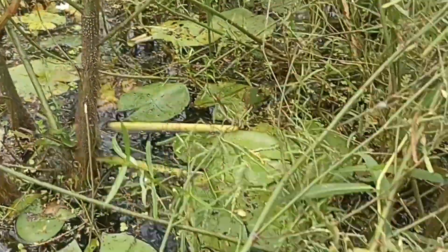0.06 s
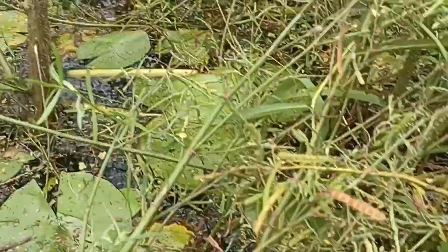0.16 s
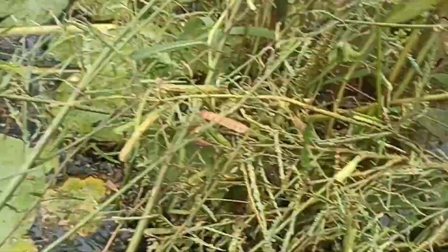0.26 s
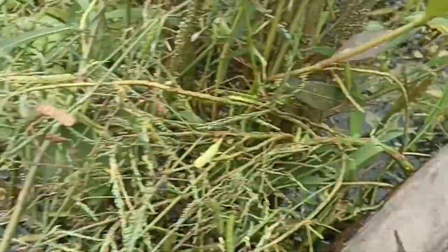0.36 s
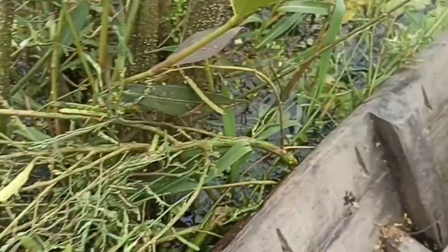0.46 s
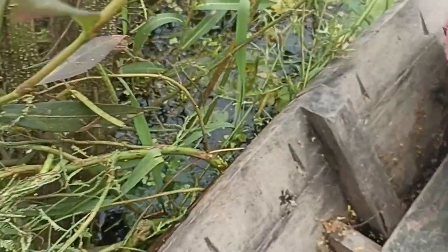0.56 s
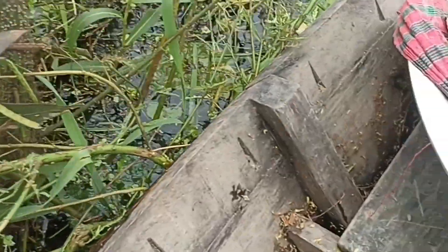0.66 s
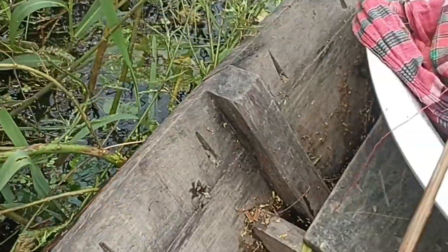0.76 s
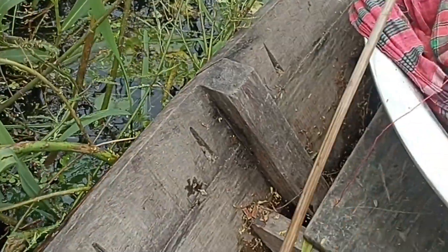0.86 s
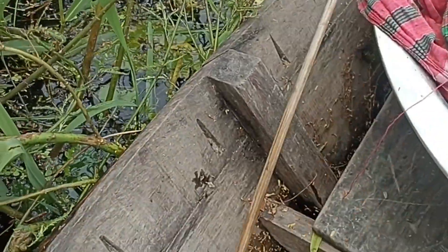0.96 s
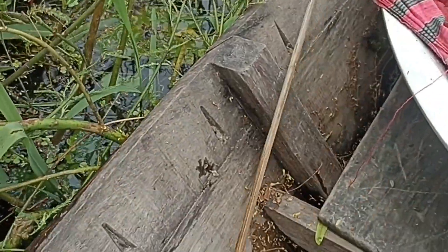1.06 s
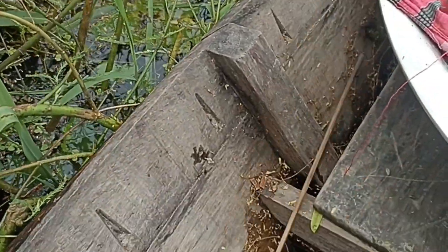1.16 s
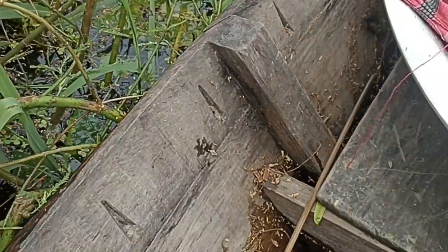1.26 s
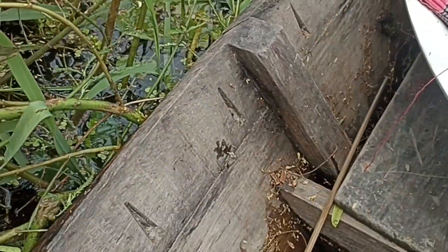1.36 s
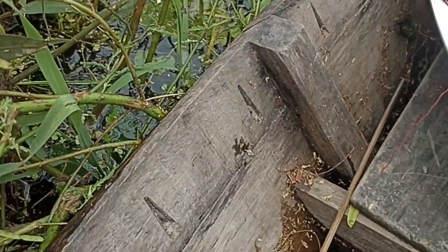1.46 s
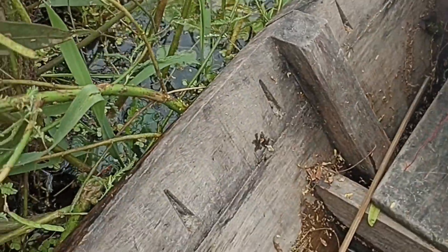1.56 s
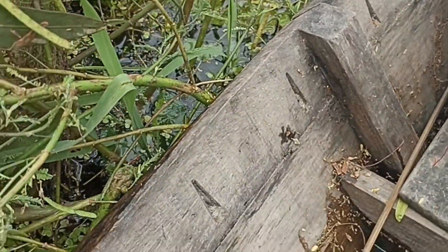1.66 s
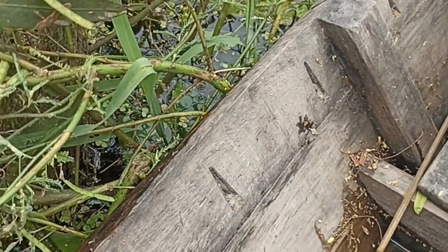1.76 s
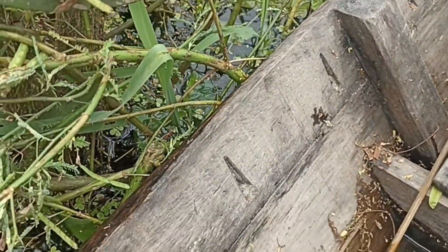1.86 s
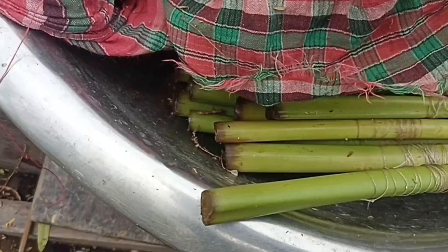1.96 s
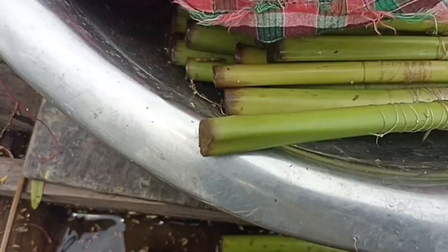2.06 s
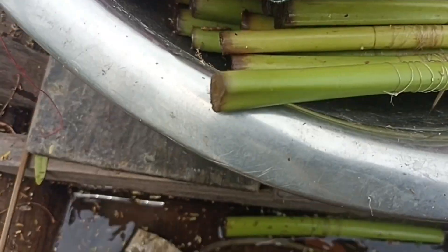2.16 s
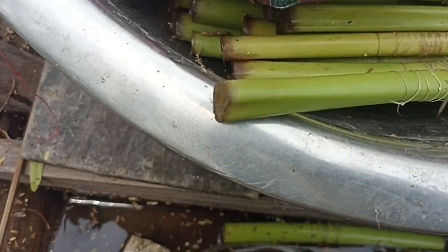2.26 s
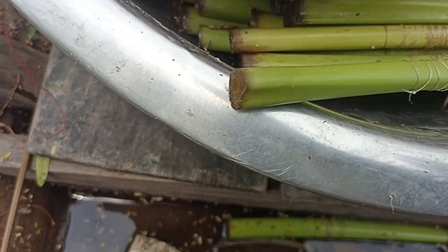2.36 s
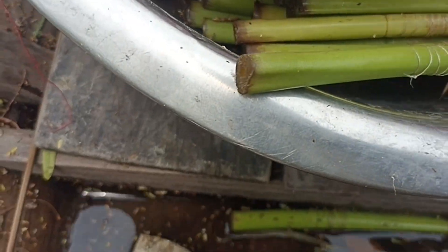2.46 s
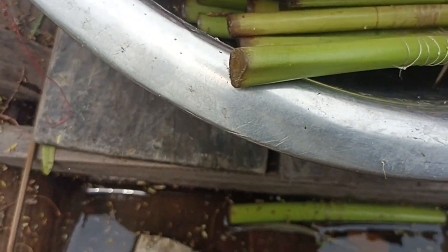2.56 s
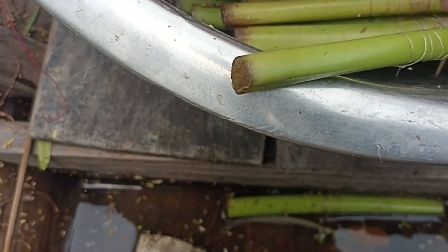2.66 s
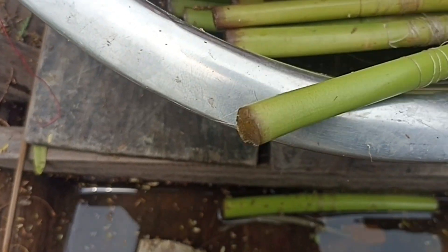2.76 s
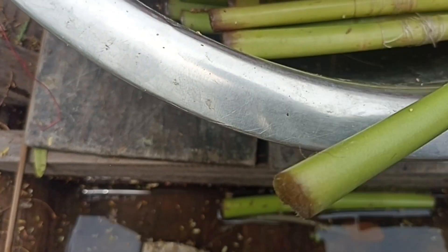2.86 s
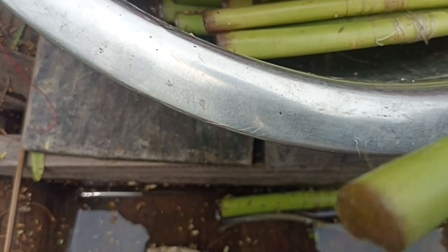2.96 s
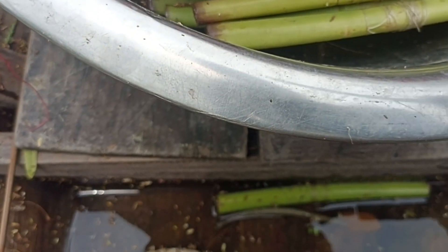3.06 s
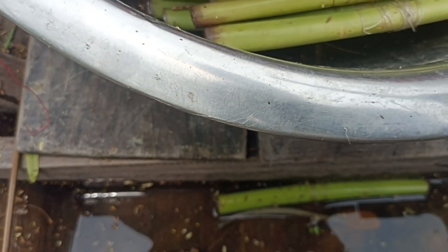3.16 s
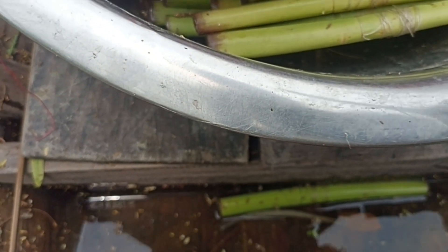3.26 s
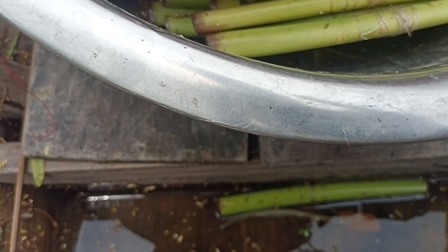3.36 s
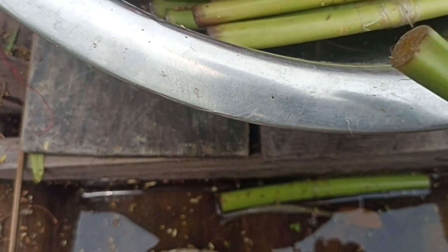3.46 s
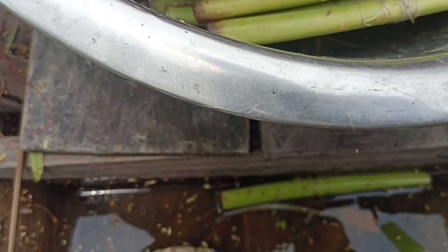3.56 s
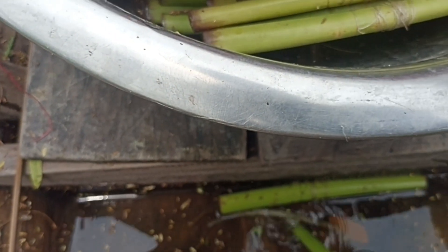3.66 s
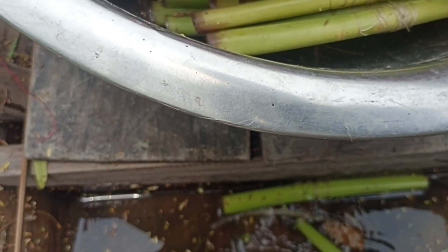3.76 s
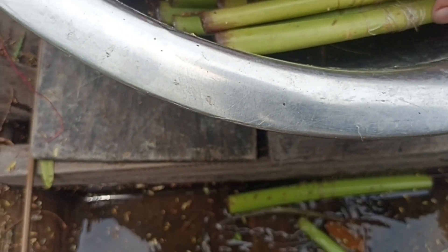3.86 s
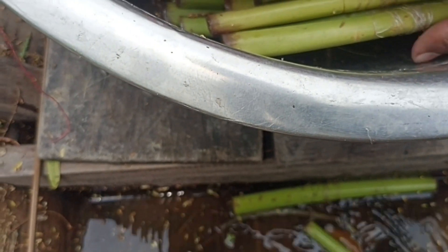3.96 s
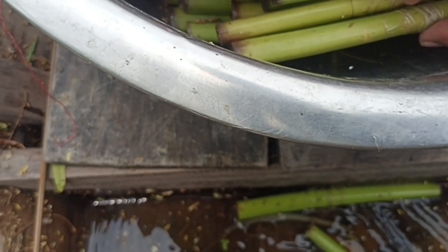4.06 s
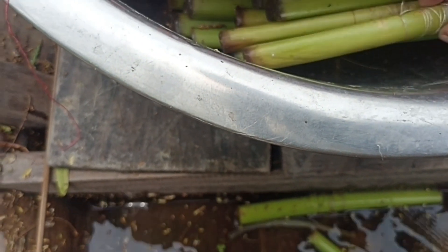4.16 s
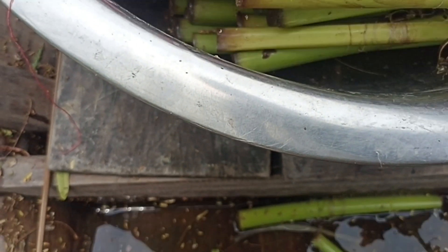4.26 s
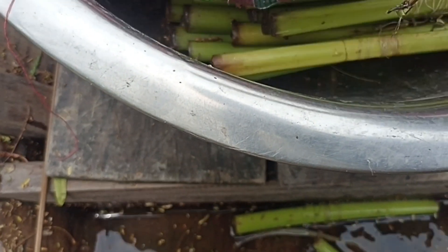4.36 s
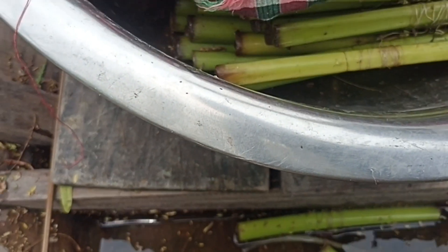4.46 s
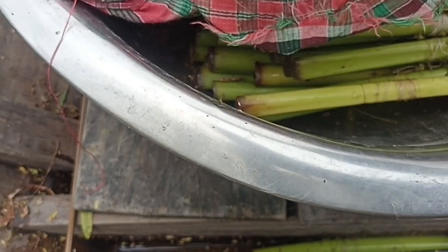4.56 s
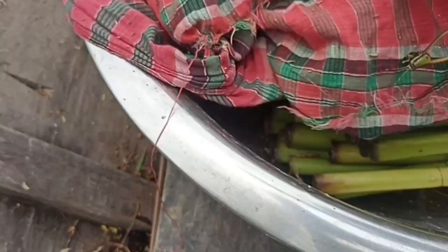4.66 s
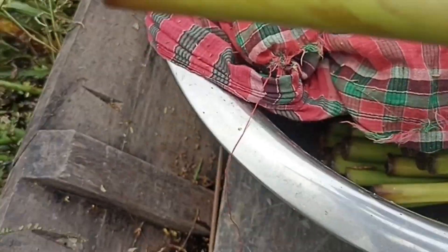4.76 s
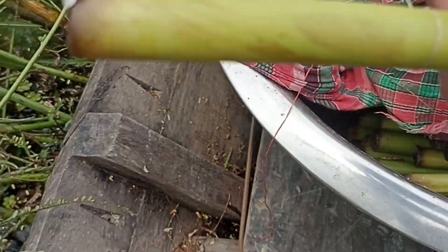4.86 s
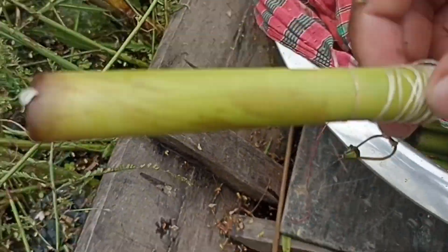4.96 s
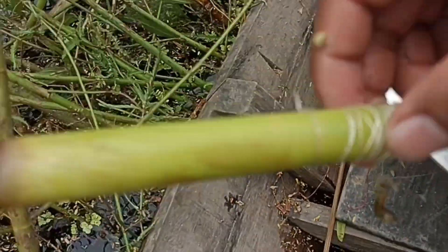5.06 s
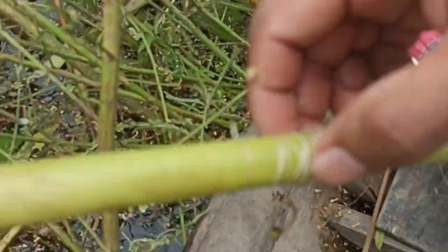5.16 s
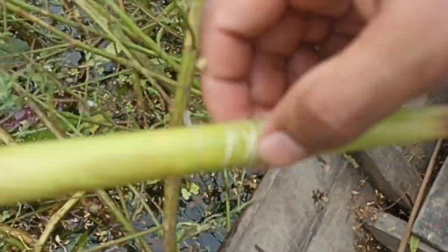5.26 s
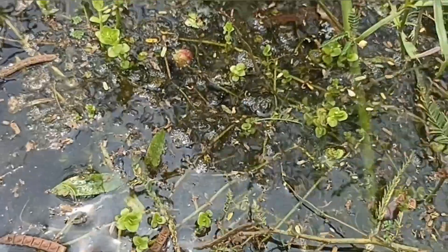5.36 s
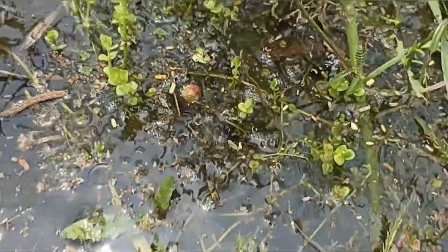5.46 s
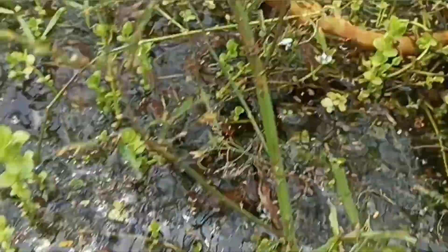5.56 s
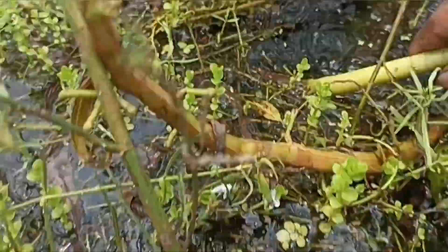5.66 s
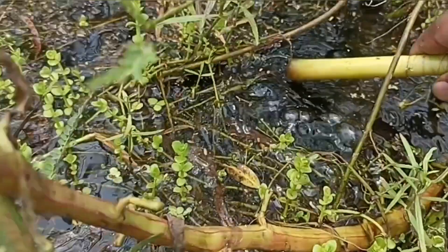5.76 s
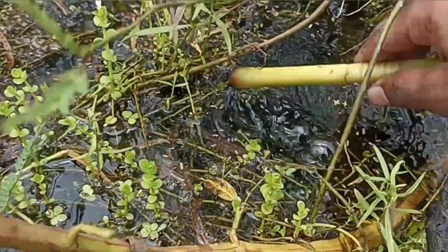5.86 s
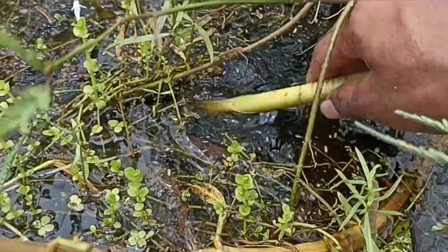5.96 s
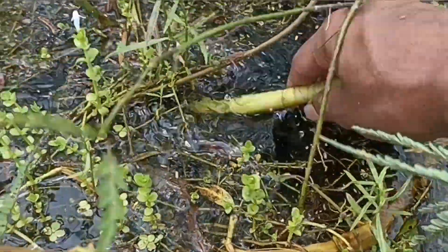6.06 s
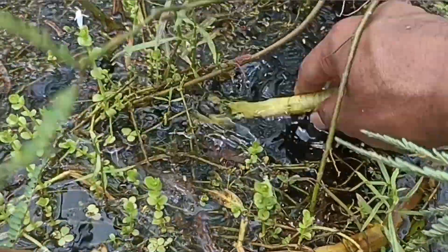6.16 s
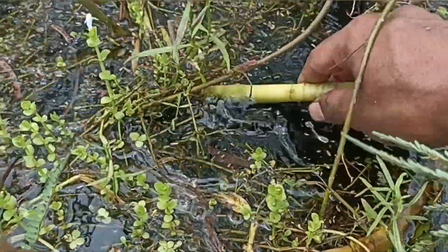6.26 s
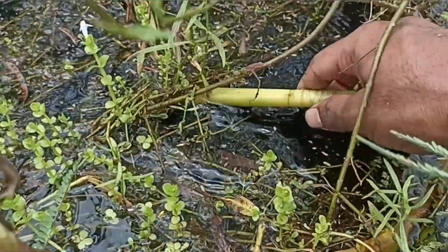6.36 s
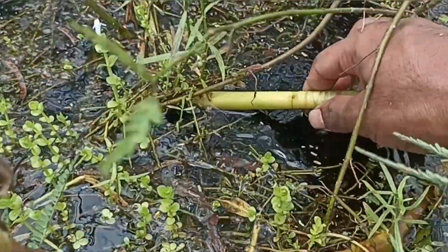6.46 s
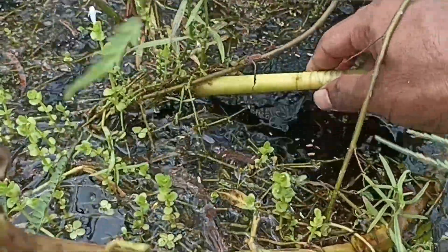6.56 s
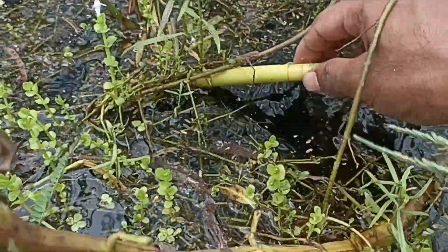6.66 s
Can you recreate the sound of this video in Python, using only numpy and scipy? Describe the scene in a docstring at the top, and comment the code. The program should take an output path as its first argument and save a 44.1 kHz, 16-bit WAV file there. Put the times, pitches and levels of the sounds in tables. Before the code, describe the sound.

Quiet outdoor wooden boat: light wooden knocks and a scrape, a dull basin bump and splash, then bubbly dips among wet weeds.

```python
"""In a wooden boat on a weedy marsh, green bamboo is taken from a metal basin and pushed into the water.
A thin pole is laid down and slides on the planks, a piece bumps the basin and drops into the bilge,
then stems snap and bubbles ring as another goes into the marsh; weeds rustle over a faint high hiss
and a few far bird-like notes. Solid bodies are sums of decaying modes, bubbles are gliding decaying
sines, and friction, spray, weeds and air are shaped noise."""
import sys
import numpy as np
from scipy import signal
from scipy.fft import rfft, irfft
from scipy.io import wavfile
from scipy.ndimage import uniform_filter1d

SR = 44100
rng = np.random.default_rng(int(sys.argv[2]) if len(sys.argv) > 2 else 0)


def put_to_file(sound):
    """Save the sound as 16-bit audio at rate SR, in the file named by the first command-line argument."""
    columns = np.atleast_2d(sound).T  # one column per channel
    safe = np.clip(columns, -1, 1)
    whole_steps = np.round(safe * 32767)
    wavfile.write(sys.argv[1], SR, whole_steps.astype(np.int16))


N = 295911
TIME = np.arange(N) / SR
RING = TIME[:SR // 2]  # time axis of one event
EARS = np.array([[1], [-1]])  # left, right

# modes of the wooden hull: (frequency [Hz], level [dB], T60 [s], phase between the ears [rad],
# left minus right [dB])
HULL_MODES = [(167, -8.5, 0.23, 0.013, -7), (214.5, -7, 0.19, 0.14, -1), (272.4, 0.5, 0.049, -0.73, 2),
              (297, -5, 0.059, 0.12, 2), (344, 3, 0.072, 0.71, -2), (472, -16, 0.15, 0.78, 13),
              (558, 3, 0.041, 0.38, -2), (654, 3, 0.05, 0.54, 1.5), (803, -13, 0.076, 1.1, 15),
              (900, 1, 0.035, 0.85, 4), (1039, -27, 0.28, -0.9, -9), (1377, -4.5, 0.043, 1.4, -1)]


def undb(db):
    """A level in decibels is 20 times the logarithm of the amplitude gain."""
    return 10 ** (np.asarray(db) / 20)


def unit(x):
    """Normalisation by the root mean square gives equal mean power."""
    return x / np.sqrt(np.mean(x ** 2))


def decay(time, t60):
    """Exponential damping: the amplitude falls by 60 dB in t60."""
    return np.exp(-np.log(1000) * time / t60)


def pan(db):
    """An interaural level difference is shared equally between the two ears."""
    return undb(EARS * db / 2)


def band(x, lo_hz, hi_hz, order=2):
    """A causal band-pass keeps one region of the spectrum."""
    hi_hz = min(hi_hz, .47 * SR)
    lo_hz = min(lo_hz, hi_hz / 2 ** (1 / 8))
    sos = signal.butter(order, [lo_hz, hi_hz], "band", fs=SR, output="sos")
    return signal.sosfilt(sos, x)


def stereo_noise():
    """Independent white noise at the two ears, as long as one event."""
    return rng.standard_normal((2, len(RING)))


def soften(x, hz):
    """Contact time: a soft contact pushes for longer and leaves the high modes quiet."""
    return signal.sosfilt(signal.butter(1, min(hz, SR / 3), fs=SR, output="sos"), x)


def radiate(x):
    """Radiation efficiency: small bodies send out little deep bass."""
    return signal.sosfilt(signal.butter(7, 172, "high", fs=SR, output="sos"), x)


def by_frequency(points):
    """A spectrum is joined from (frequency [Hz], value) points on a logarithmic axis."""
    hz, value = np.transpose(points)
    bins_hz = np.arange(N // 2 + 1) * SR / N
    return np.interp(np.log(bins_hz + 1), np.log(hz), value)


def walk(rate):
    """Slow random modulation: rate new levels a second, joined by straight slopes."""
    hold = int(SR / rate)
    levels = np.repeat(rng.standard_normal(N // hold + 1), hold)
    return uniform_filter1d(levels, hold)[:N]


def crackle(rate, spread_db):
    """A Poisson-like train of tiny impacts, most weak and a few strong."""
    happens = rng.random(N) < rate / SR
    size = np.minimum(rng.exponential(size=N), 4)
    sign = rng.choice([-1, 1], N)
    return happens * sign * undb(spread_db * size)


def swell(middle_s, half_s):
    """A flat-topped envelope that comes up, holds and goes down smoothly."""
    return np.exp(-.5 * ((TIME - middle_s) / half_s) ** 4)


def gesture(start_s, stop_s, attack_s, release_t60):
    """A driven-system envelope: an attack, a hold until stop_s and a free decay."""
    attack = 1 - np.exp(-np.maximum(TIME - start_s, 0) / attack_s)
    return attack * decay(np.maximum(TIME - stop_s, 0), release_t60)


def burst(hz, t60, spread, onset_s, grain_db):
    """Damped band noise around one frequency, grainy from random gains held about 1 ms."""
    hold = SR // 1000
    grains = np.repeat(rng.standard_normal(len(RING) // hold + 1), hold)[:len(RING)]
    envelope = decay(RING, t60) * (1 - np.exp(-RING / onset_s))
    grainy = stereo_noise() * undb(grain_db * grains)
    noise = band(grainy, hz / spread, hz * spread, order=1) * envelope
    return unit(noise) * np.sqrt(np.mean(envelope ** 2))


def add(out, s, sound):
    """Linear superposition: a sound is mixed in at time s."""
    i = min(int(s * SR), N)
    out[:, i:i + sound.shape[1]] += sound[:, :N - i]


def ring(modes):
    """Modal superposition: each decaying mode has its own phase and balance at the ears."""
    out = np.zeros((2, len(RING)))
    for hz, db, t60, phase, pan_db in modes:
        tone = np.sin(2 * np.pi * hz * RING + EARS * phase / 2)
        out += undb(db) * pan(pan_db) * decay(RING, t60) * tone
    return out


def knocks(modes, blows, crack_db, crack_db_per_octave, crack_t60, crack_lo_hz, crack_hi_hz):
    """Impact excitation rings the modes and a short noise crack, its share set by contact brightness."""
    out, body = np.zeros((2, N)), ring(modes)
    for s, db, contact_hz in blows:
        crack = unit(band(stereo_noise(), crack_lo_hz, crack_hi_hz)) * decay(RING, crack_t60)
        crack_gain = undb(crack_db + crack_db_per_octave * np.log2(contact_hz / 1000))
        add(out, s, undb(db) * soften(body + crack_gain * crack, contact_hz))
    return radiate(out)


def basin_knocks():
    """Modal ringing of the metal basin when a piece bumps it."""
    # modes of the basin: (frequency [Hz], level [dB], T60 [s], phase between the ears [rad],
    # left minus right [dB])
    modes = [(205, -15, .3, 1.4, 3), (253.5, 0, .07, -.5, 1), (295, 6.5, .085, -.5, -3),
             (372, -11, .16, -.7, 0), (423, -2, .03, -.1, -6.5), (549, -14, .08, 1.3, -10),
             (641, 3.5, .27, -3, -5), (705, -4, .19, 1.8, 9), (917, -26, 0.3, 0, 6),
             (1057, -27, 0.33, .6, 9), (1253, -16, 0.22, -.4, 1), (1490, -20, 0.06, -.7, -3),
             (1665, -21, 0.08, 1.4, -1), (1960, -23, 0.19, 1.7, -12), (2305, -15, 0.1, 0, 4),
             (2595, -8, 0.05, -1, -3), (2885, -10, 0.13, .8, -8), (2985, -14, 0.16, -2.2, 6),
             (3288, -11, 0.08, -.4, -2), (3525, -12, 0.07, -.6, 5)]
    # blows: (time [s], level [dB], contact brightness [Hz])
    blows = [(3.5497, -40, 1166), (3.5543, -29.5, 1050), (3.5621, -31, 1410), (3.569, -32.5, 700),
             (3.5848, -29.5, 300), (3.5983, -38.5, 400), (4.1087, -42.5, 150), (4.1155, -46.5, 148)]
    return knocks(modes, blows, crack_db=-16, crack_db_per_octave=-1, crack_t60=0.12,
                  crack_lo_hz=330, crack_hi_hz=3200)


def hull_knocks():
    """Modal ringing of the boat's planks; here a brighter contact has a stronger crack."""
    # blows: (time [s], level [dB], contact brightness [Hz])
    blows = [(0.495, -52.5, 2250), (1.137, -44.5, 300), (1.149, -41, 200), (1.165, -46, 250),
             (1.207, -48, 300), (1.189, -50.5, 2200), (1.228, -43.5, 1200), (1.249, -45, 1800),
             (1.257, -31.5, 1390), (1.2614, -33.5, 1010), (1.295, -45, 1300), (1.307, -45.5, 800),
             (1.326, -48.5, 700), (1.339, -50.5, 600), (1.371, -56, 500), (2.727, -48.5, 900),
             (3.7015, -41, 1950), (4.232, -57, 500), (6.117, -51, 1000), (6.533, -54.5, 300)]
    return knocks(HULL_MODES, blows, crack_db=-5.5, crack_db_per_octave=8.0, crack_t60=0.072,
                  crack_lo_hz=504, crack_hi_hz=2160)


def pole_knocks():
    """Short modal ringing of the thin pole as it is laid down."""
    # modes of the pole: (frequency [Hz], level [dB], T60 [s], phase between the ears [rad],
    # left minus right [dB])
    modes = [(910, -6, 0.03, 0.35, 0), (1206, -7, 0.03, 2.6, 4), (1460, 1.5, 0.033, 1.7, 5),
             (1680, -4, .035, -1, 0), (1870, 0, 0.045, 1.3, -5), (2140, -2.5, 0.045, .7, -7),
             (2410, 1.5, 0.06, .6, -1), (2750, -4, 0.027, .7, 0), (3050, -2, 0.045, .7, 0),
             (3300, -3, 0.025, .4, 0)]
    # blows: (time [s], level [dB], contact brightness [Hz])
    blows = [(1.135, -36, 3440), (1.1385, -51, 2910), (1.143, -39, 2470)]
    return knocks(modes, blows, crack_db=0.5, crack_db_per_octave=-1.5, crack_t60=0.064,
                  crack_lo_hz=584, crack_hi_hz=3260)


def stalk_knocks():
    """Modal ringing of a green bamboo stalk when it is struck."""
    # modes of the stalk: (frequency [Hz], level [dB], T60 [s], phase between the ears [rad],
    # left minus right [dB])
    modes = [(410, -12, 0.043, -0.37, 8), (471, 3.5, 0.066, 0.81, -5), (609, -6.5, 0.094, 1, 5),
             (735, -12, 0.13, 0.93, 9), (1150, -22, 0.15, -0.54, 2), (2170, -17, 0.11, 0, 4),
             (2980, -12, 0.11, -1.1, 4), (3314, 1, 0.06, -1.2, -8), (3445, -1.5, 0.1, -1.5, 0),
             (3910, -3.5, .05, 1, 6), (4620, -15, .06, 0, 0)]
    # blows: (time [s], level [dB], contact brightness [Hz])
    blows = [(2.7175, -47, 3000), (2.7228, -44.5, 2500), (2.7278, -42.5, 2000), (3.6925, -38.5, 2500),
             (3.6978, -54, 3990), (3.703, -50, 4500)]
    return knocks(modes, blows, crack_db=5.5, crack_db_per_octave=-4.0, crack_t60=0.076,
                  crack_lo_hz=2870, crack_hi_hz=5900)


def slide(damped_t60=0.015, grain_db=-3, dull_hz=900):
    """Stick-slip friction: the pole's weight damps the hull's ring; the scrape dulls as it slows."""
    start_s, stop_s, level_db = 1.168, 1.316, -46.5
    grain = unit(band(stereo_noise(), 550, 4700, order=1)) * decay(RING, 0.08)
    body = ring(HULL_MODES) * decay(RING, damped_t60) + undb(grain_db) * grain
    slips = crackle(rate=670, spread_db=3.0)
    scrape = unit(radiate(signal.fftconvolve(slips[None], body, axes=1)[:, :N]))
    speed = np.interp(TIME, [start_s, stop_s], [1, 0])  # share of the first speed
    dull = undb(2.5) * soften(scrape, dull_hz)
    scrape = speed * scrape + (1 - speed) * dull
    return scrape * undb(level_db) * gesture(start_s, stop_s, attack_s=0.01, release_t60=0.15)


def bubbles(rise_s=0.0099, onset_s=0.00009, pop_db=-8, pop_t60=0.023, scatter_db=-13, scatter_t60=0.043):
    """Bubble resonance: trapped air pops and rings; big bubbles rise, small ones sag; boat and weeds scatter."""
    # bubbles: (time [s], starting pitch [Hz], level [dB], left minus right [dB])
    bubble_rows = [(3.7015, 3700, -26, 1), (3.7155, 1574, -37.5, -10), (3.716, 3060, -36, -14),
                   (3.721, 1730, -36, -4), (3.7623, 3200, -53, -11), (3.807, 2400, -65, -2),
                   (3.8965, 3680, -50, 4), (3.9444, 2960, -48, 5), (4.0237, 3800, -49.5, -4),
                   (4.168, 2450, -56, 3), (4.185, 2510, -55, 2), (4.2377, 2480, -51, -4),
                   (4.355, 3470, -55, 4), (4.436, 3760, -58.5, -7), (5.429, 2330, -28, -4),
                   (5.4284, 5970, -31, 0), (5.546, 6080, -44, -6.5), (5.653, 3420, -41.5, 2),
                   (5.6605, 3260, -40.5, 0), (5.6688, 547.4, -38, -0.5), (5.671, 1480, -45, 4),
                   (5.681, 1180, -54, 2), (5.687, 2530, -46.5, 0), (5.739, 1120, -48, 5),
                   (5.7402, 1496, -41, 0), (5.787, 2100, -50.5, -1), (5.821, 2780, -53, 0),
                   (5.852, 3370, -52.5, 0), (5.876, 5325, -48, -14), (5.877, 2500, -46.5, 0),
                   (5.907, 2170, -46, 0), (5.935, 1670, -47.5, 2), (6.0482, 2030, -44, 2),
                   (6.051, 1420, -38, 6), (6.0786, 5240, -28.5, -6.5), (6.0783, 1200, -42, 2),
                   (6.078, 2020, -41, 5), (6.089, 1420, -61, 0), (6.1, 6430, -33, -2),
                   (6.108, 1120, -45, 4), (6.1, 630, -64, -8), (6.126, 2060, -31.5, 6),
                   (6.127, 780, -43.5, 3), (6.139, 1070, -47, 4), (6.117, 1730, -52, 2),
                   (6.143, 2500, -51, 0), (6.153, 1520, -60, 2), (6.217, 3370, -51, 2),
                   (6.274, 1080, -63, -5), (6.296, 1400, -45, 4), (6.355, 2600, -58, 0)]
    big_hz, rise_octaves, sag_octaves = 553, 0.77, 0.14
    fade_cycles = 46  # periods until a tone has faded by 60 dB
    out = np.zeros((2, N))
    for s, hz, db, pan_db in bubble_rows:
        volume = (big_hz / hz) ** 3  # relative to the big bubble
        glide_octaves = (rise_octaves * volume - sag_octaves) * (1 - np.exp(-RING / rise_s))
        pitch = hz * 2 ** glide_octaves
        tone = np.sin(2 * np.pi * np.cumsum(pitch) / SR)
        tone = tone * decay(RING, fade_cycles / hz) * (1 - np.exp(-RING / onset_s))
        pop = unit(band(stereo_noise(), hz / 1.1, hz * 1.143)) * decay(RING, pop_t60)
        add(out, s, undb(db) * pan(pan_db) * (tone + undb(pop_db) * pop))
    echoes = stereo_noise() * decay(RING, scatter_t60)
    echoes *= undb(scatter_db) / np.sqrt(np.sum(echoes[0] ** 2))
    return out + signal.fftconvolve(out, echoes, axes=1)[:, :N]


def splashes():
    """Damped spray noise: water slaps and sprays; the finer the spray, the sooner it is over."""
    # splashes: (time [s], level [dB], centre [Hz], left minus right [dB])
    splash_rows = [(3.691, -39, 3820, 15), (3.696, -30, 2670, -5), (3.7016, -21, 12000, 2.5),
                   (3.7163, -46.5, 2190, 5), (3.732, -41.5, 4900, -1), (3.76, -48.5, 3300, 3),
                   (3.806, -50, 5000, -3), (3.943, -37.5, 4000, -5), (4.028, -45, 4160, -2),
                   (5.652, -43, 6300, -2), (5.675, -44.5, 5030, -2), (5.687, -50, 4530, -2),
                   (5.8758, -37, 5270, 2), (6.041, -45.5, 5360, -7), (6.047, -39.5, 2380, -1),
                   (6.073, -42, 5500, 6), (6.088, -39, 5000, 10), (6.103, -46, 2800, 6),
                   (6.114, -41, 2900, 0), (6.1234, -26, 12900, 8), (6.1247, -35, 4230, -7)]
    fade_cycles = 121  # periods until a splash has faded by 60 dB
    out = np.zeros((2, N))
    for s, db, hz, pan_db in splash_rows:
        spray = burst(hz, fade_cycles / hz, spread=1.29, onset_s=0.0019, grain_db=5.0)
        add(out, s, undb(db) * pan(pan_db) * spray)
    return out


def droplets(count=1900, centre_hz=1700, octaves=0.704, cycles=20, spread_db=6.0, attack_s=0.0014):
    """A bubble cloud: many tiny rising rings, made loud by each dip and gurgle of the water."""
    # the stalk and hand dip into the water: (time [s], level [dB])
    dips = [(5.441, -61.5), (5.529, -58), (5.665, -52.5), (5.729, -61.5), (5.889, -65), (6.047, -52),
            (6.088, -49), (6.116, -54), (6.272, -69)]
    # stirred water gurgles on: (middle [s], half length [s], level [dB])
    gurgles = [(5.496, 0.038, -70.5), (5.82, .13, -73.5), (6.138, 0.026, -60), (6.23, 0.093, -69)]
    settle_t60 = 0.13  # s
    out = np.zeros((2, N))
    t, first_s = RING[:SR // 20], dips[0][0]
    times = rng.uniform(first_s, TIME[-1], count)
    for s, (pitch, size, side) in zip(times, rng.standard_normal((count, 3))):
        hz = centre_hz * 2 ** (octaves * np.clip(pitch, -2, 2))
        age = t * hz / cycles
        phase = 2 * np.pi * hz * t * (1 + 0.21 * age)  # rising pitch
        tone = np.sin(phase + side * EARS / 2) * decay(age, 1)
        add(out, s, undb(spread_db * np.clip(size, -2, 2)) * pan(3 * side) * tone)
    stir = sum(undb(db) * gesture(s, s, attack_s, settle_t60) for s, db in dips)
    stir = stir + sum(undb(db) * swell(s, half) for s, half, db in gurgles)
    return out / np.sqrt(np.mean(out[:, TIME > first_s] ** 2)) * stir


def drips(count=900, octaves=0.77, cycles=10, spread_db=5):
    """Small damped oscillators: the dropped stalk trickles and fizzes in the bilge, ever fainter."""
    start_s, stop_s, centre_hz = 3.72, 4.48, 3170
    start_db, fall_db_per_s = -70, 16.5
    out, t = np.zeros((2, N)), RING[:SR // 20]
    times = rng.uniform(start_s, stop_s, count)
    for s, (pitch, size, side) in zip(times, rng.standard_normal((count, 3))):
        hz = centre_hz * 2 ** (octaves * np.clip(pitch, -2, 1.5))
        ping = np.sin(2 * np.pi * hz * t) * decay(t, cycles / hz)
        db = start_db + spread_db * min(size, 2) - fall_db_per_s * (s - start_s)
        add(out, s, undb(db) * pan(4 * side) * ping)
    return out


def handling():
    """Transient and frictional noise: dry stems flick briefly; stalks and pole scuff for longer."""
    # dry blades and stems flicking: (time [s], level [dB], centre [Hz])
    flicks = [(0.076, -46, 6300), (0.161, -53, 5300), (0.265, -46, 4400), (.285, -47, 13000),
              (0.343, -43, 3060), (.423, -53, 1970), (0.4941, -39, 5170), (0.711, -59, 6600),
              (.753, -43, 8700), (0.833, -56.5, 3100), (1.136, -38, 5140), (3.6769, -43, 7060),
              (5.4277, -40, 4950), (6.009, -52, 5500)]
    # stalks and pole scuffing past things: (time [s], level [dB], centre [Hz])
    scuffs = [(0.497, -44.5, 2210), (0.705, -52.5, 5100), (1.14, -52.5, 4440), (1.19, -48.5, 3140),
              (2.722, -51.5, 5100), (2.8, -54, 4300), (3.556, -53.5, 2770), (4.231, -67, 2490)]
    out = np.zeros((2, N))
    for s, db, hz in flicks:
        add(out, s, undb(db) * burst(hz, t60=0.014, spread=1.27, onset_s=0.0001, grain_db=13.5))
    for s, db, hz in scuffs:
        scuff = burst(hz, t60=0.22, spread=1.85, onset_s=0.00022, grain_db=-2.0)
        add(out, s, undb(db) * pan(-0.5) * scuff)
    return out


def rubbing():
    """Friction noise through one broad, hollow resonance, perhaps sleeve or hand; it swells unevenly."""
    # rubs as the arm moves: (middle [s], half length [s], level before the unevenness [dB])
    rubs = [(0.664, 0.13, -65.5), (2.015, 0.046, -62), (3.403, 0.13, -65), (5.07, 0.2, -61)]
    centre_hz, width_hz = 451, 115
    noise = unit(band(rng.standard_normal(N), centre_hz - width_hz / 2, centre_hz + width_hz / 2))
    motion = sum(undb(db) * swell(s, half) for s, half, db in rubs)
    return pan(-5) * noise * undb(1.3 * walk(9.9)) * motion


def weeds():
    """Granular impact noise: blades and wet leaves tick together, louder when they are disturbed."""
    # stirred weeds: (middle [s], half length [s], level before the flicker [dB])
    rustles = [(0.454, 0.4, -66), (2.15, 0.18, -71.5), (2.85, 0.24, -80), (3.984, 0.29, -67.5),
               (4.204, 0.05, -72), (6.048, 0.37, -69.5)]
    still_db = -75.5  # before the flicker
    ticks = np.array([crackle(rate=900, spread_db=1.5) for _ in range(2)])
    motion = undb(still_db) + sum(undb(db) * swell(s, half) for s, half, db in rustles)
    flicker_db = -0.5 + 3.1 * np.clip(walk(22), -1.5, 1.5)
    return unit(band(ticks, 170, 3670, order=1)) * motion * undb(flicker_db)


def whistles():
    """Frequency modulation: faint notes, like far birds', rise to a top and fall again, wavering."""
    # notes: (middle [s], half length [s], level [dB], top pitch before the waver [Hz])
    notes = [(.648, .055, -62, 665), (2.685, .025, -81, 4970), (2.963, .036, -76, 5050),
             (3.09, .018, -81, 4970)]
    out = np.zeros(N)
    for s, half, db, top_hz in notes:
        # 12 % of the pitch is lost at half a length from the middle
        arch = np.maximum(1 - 0.12 * ((TIME - s) / half) ** 2, 0)
        pitch = top_hz * arch * (1 + 0.037 * walk(700))
        out += undb(db) * swell(s, half) * np.sin(2 * np.pi * np.cumsum(pitch) / SR)
    return out


def hiss():
    """Amplitude-modulated high-band noise, which flickers the more the stronger it is."""
    # level of the hiss before flicker and surges: (time [s], level [dB])
    hiss_levels = [(0.0, -61), (.2, -62), (0.34, -56.5), (.58, -63), (.73, -57.5), (.88, -60.5),
                   (1.02, -59.5), (1.3, -58.5), (1.62, -63.5), (1.74, -58.5), (1.93, -59.5), (2.0, -66.5),
                   (6.71, -65.5)]
    # brief surges and dips: (middle [s], gain [dB])
    surges = [(.12, -11), (.408, -6), (0.425, 8), (0.448, -7), (0.466, 10.5), (.485, -2), (.79, -9),
              (0.808, 4), (1.08, -5), (1.1, 8), (1.367, -8), (1.39, 8.5), (1.52, 6.5), (1.96, 13.5)]
    # (frequency [Hz], relative level [dB])
    colour = [(7000, -61), (10000, -6.5), (11300, -8.0), (12200, 0.0), (13200, -8.5), (15500, 0.5)]
    noise = irfft(rfft(rng.standard_normal((2, N))) * undb(by_frequency(colour)), N)
    strength = undb(np.interp(TIME, *np.transpose(hiss_levels)))
    flicker_db = -0.5 + 4.8 * walk(70) * strength / strength.max()
    surge_db = sum(db * swell(s, half_s=0.0046) for s, db in surges)
    return unit(noise) * strength * undb(flicker_db + surge_db)


def wander(spectrum, rate, depth_db):
    """Band-wise modulation: each octave drifts in level on its own, the higher ones less."""
    bins_hz = np.arange(N // 2 + 1) * SR / N
    octave = np.clip(np.log2(bins_hz / 60 + 1e-9), 0, 5)
    out = 0
    for k in range(6):
        weight = np.maximum(1 - np.abs(octave - k), 0)
        out = out + irfft(spectrum * weight, N) * undb(depth_db * walk(rate) / (1 + k / 2))
    return out


def air():
    """Partly coherent noise: low outdoor rumble, and the boom of the boat's hollow."""
    # the open air: (frequency [Hz], relative level per Hz [dB])
    air_colour = [(15, -45), (25, -28), (48, -22), (72, -8.5), (97, -3.5), (168, -9), (240, -10),
                  (299, -14), (380, -14), (560, -23), (1530, -31), (3000, -31.5), (5000, -39), (10000, -45),
                  (13000, -69), (22000, -120)]
    # likeness of the two ears: (frequency [Hz], correlation [0-1])
    likeness = [(60, 0.47), (150, 0.75), (400, 0.49), (800, 0.14), (4000, 0)]
    mid, side = rfft(rng.standard_normal((2, N)))
    alike = by_frequency(likeness)
    ears = mid * np.sqrt(1 + alike) + EARS * side * np.sqrt(1 - alike)
    rumble = unit(wander(ears * undb(by_frequency(air_colour)), rate=6, depth_db=1.0))
    rumble = rumble * undb(-57.93 + 1.4 * walk(5.1))
    boom = unit(band(rng.standard_normal(N), 87.4, 130.0)) * undb(-64) * swell(middle_s=3, half_s=1.7)
    return rumble + boom


def scene():
    """Superposition of wood, metal and water over the marsh air."""
    solids = basin_knocks() + hull_knocks() + pole_knocks() + stalk_knocks() + slide()
    water = bubbles() + splashes() + droplets() + drips()
    touches = handling() + rubbing()
    return solids + water + touches + weeds() + whistles() + hiss() + air()


def record(dry):
    """Port resonance lifts the left microphone's high treble; deep bass and the top are cut."""
    left = dry[0] + undb(14.5) * band(dry[0], 11690, 14610)
    ears = np.array([left, dry[1]])
    ears = signal.sosfilt(signal.butter(1, 30, "high", fs=SR, output="sos"), ears)
    return signal.sosfilt(signal.ellip(10, .2, 70, 15800, fs=SR, output="sos"), ears)


dry = scene()
out = record(dry)
put_to_file(out)
```